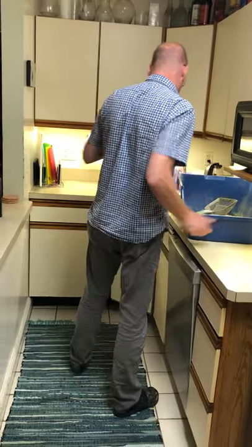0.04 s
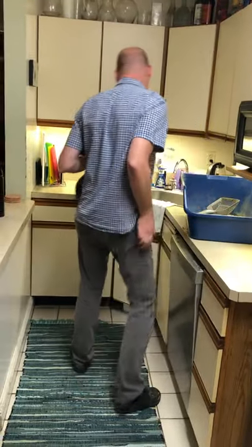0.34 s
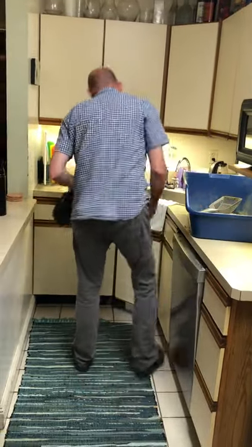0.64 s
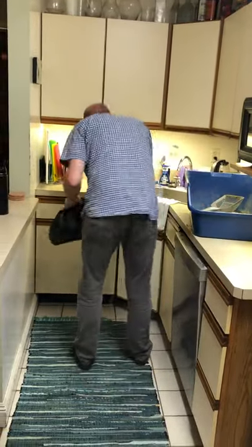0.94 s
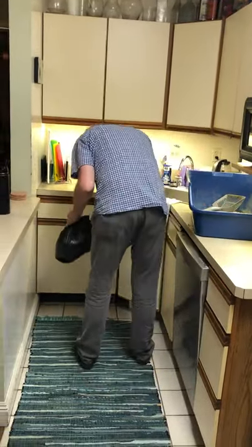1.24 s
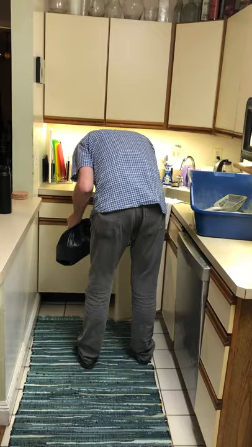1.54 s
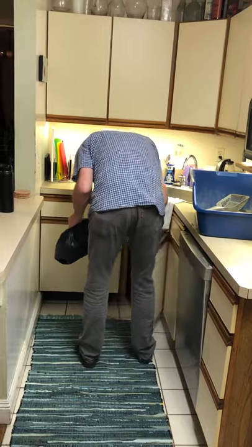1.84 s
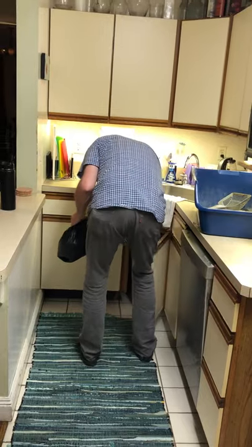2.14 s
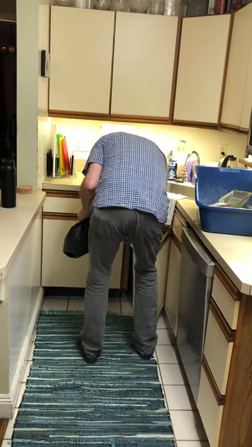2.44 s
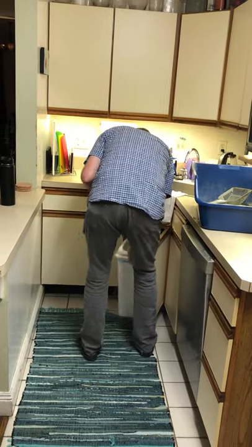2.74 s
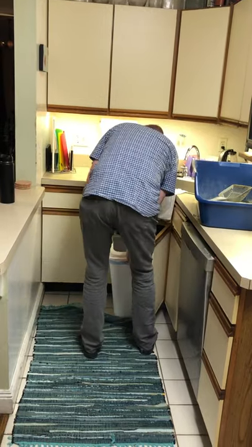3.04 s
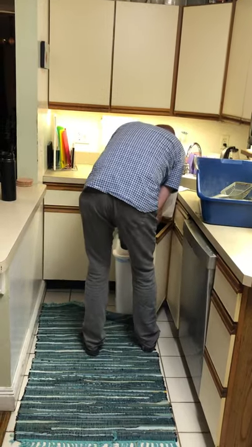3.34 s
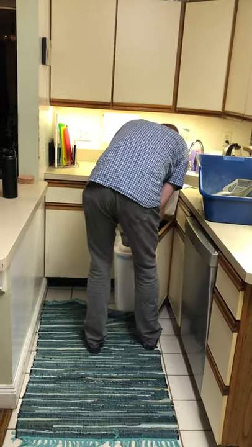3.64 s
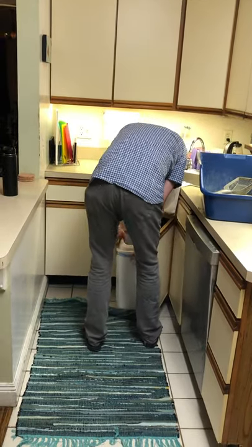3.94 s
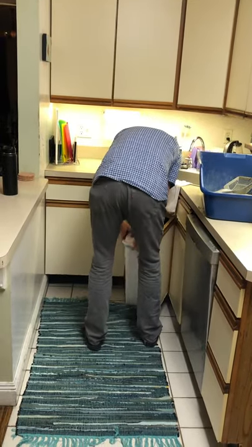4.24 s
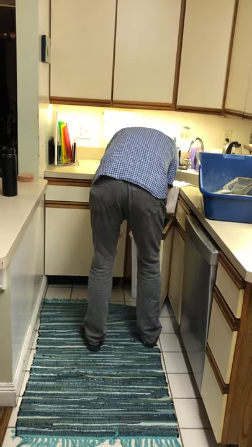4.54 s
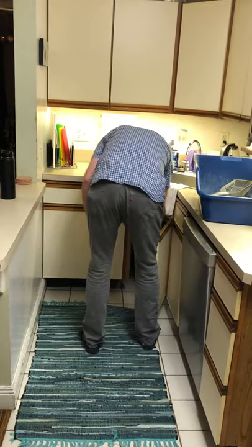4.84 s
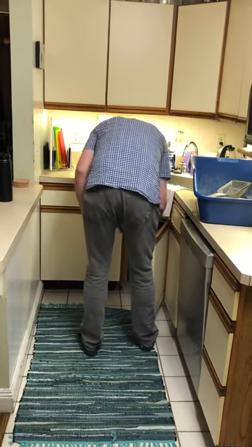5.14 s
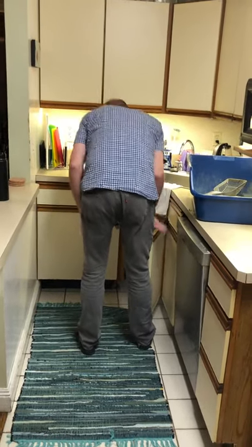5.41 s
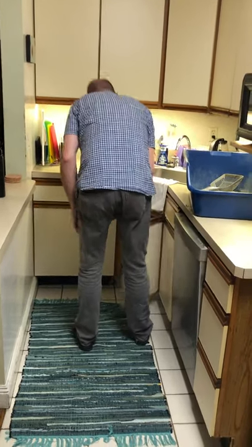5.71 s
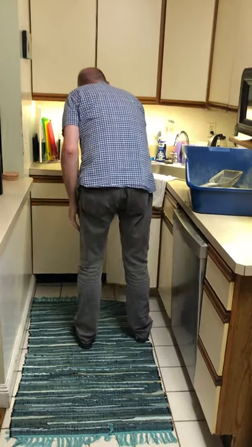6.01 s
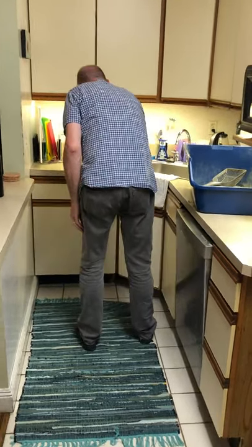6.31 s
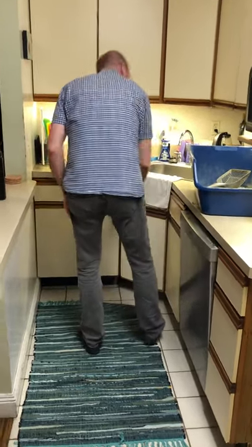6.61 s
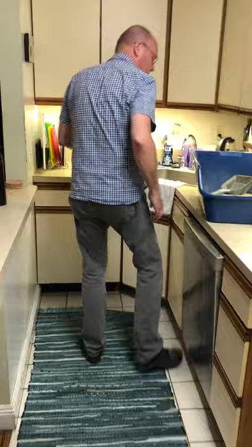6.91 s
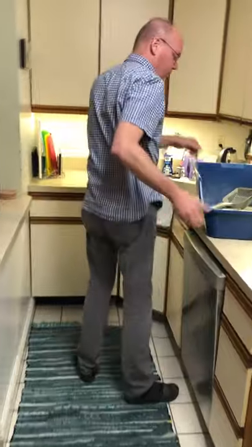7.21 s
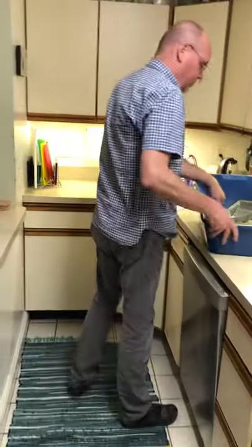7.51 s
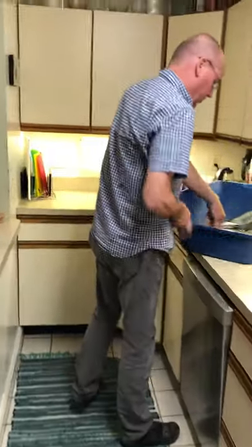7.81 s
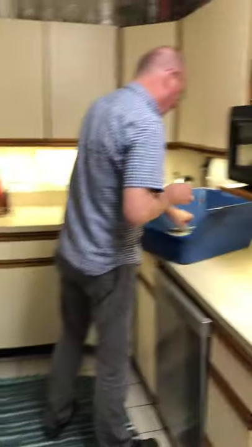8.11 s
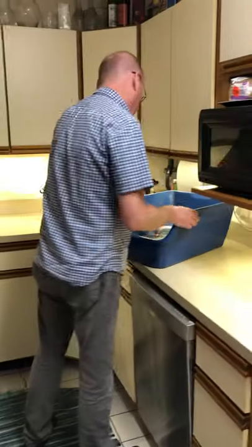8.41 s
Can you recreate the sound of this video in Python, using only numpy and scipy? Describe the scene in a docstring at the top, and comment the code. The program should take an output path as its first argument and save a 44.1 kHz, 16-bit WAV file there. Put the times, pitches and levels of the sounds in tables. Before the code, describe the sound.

A faint appliance hum runs throughout in a small kitchen with a short, hard echo. Clothes swish, shoes shuffle and small parts click during the first second. At 1.2 seconds a cupboard door bangs open. From about 2.2 to 3.1 seconds a plastic bin is dragged out over the floor, scraping and droning, with hollow knocks, the strongest at 2.6. A bag rustles, and litter hisses into the bin in two short gushes at about 3.3 and 3.6 seconds. From 4.1 to 5.1 seconds the bin slides back with more bumps and a rattle. Soft shuffles follow. At 6.3 seconds the door slams shut with a sharp crack, a ringing panel and a low thud, the loudest sound. From about 7.5 to 8.2 seconds a plastic litter box slides along the counter with a gritty hiss and one small squeak.

```python
"""A cupboard door bangs open and later slams shut in a small hard kitchen: a crack, a ringing panel, a boom.
In between, a plastic bin is dragged out and slid back, its thin walls droning and knocking hollowly;
a bag rustles and litter hisses into the bin, both as streams of tiny noise grains.
Last, a plastic litter box slides along the counter with a gritty hiss and one squeak.
Shoes shuffle, small parts click, and an appliance hums underneath throughout."""
import sys
import numpy as np
from scipy import signal
from scipy.fft import rfft, irfft, next_fast_len
from scipy.io import wavfile
from scipy.ndimage import map_coordinates

SR = 44100
rng = np.random.default_rng(int(sys.argv[2]) if len(sys.argv) > 2 else 0)


def file_out(sig):
    """Save sig as 16-bit WAV at sys.argv[1]."""
    # one column per channel
    cols = np.atleast_2d(sig).T
    # limit, then scale
    lim = np.clip(cols, -1, 1)
    pcm = np.round(lim * 32767).astype(np.int16)
    wavfile.write(sys.argv[1], SR, pcm)


N = 373086
TIME = np.arange(N) / SR  # the whole scene [s]
HIT_TIME = np.arange(SR) / SR  # the life of one hit [s]


def amp(db):
    """Decibels to gain."""
    return 10 ** (np.asarray(db) / 20)


def unit(x):
    """Scale to rms 1."""
    return x / np.sqrt(np.mean(x ** 2) + 1e-20)


def along(points, hz):
    """Read a curve of (frequency, value) points on a log frequency axis."""
    freqs, values = np.transpose(points)
    return np.interp(np.log(hz + 1), np.log(freqs + 1), values)


def wobble(rate):
    """A smooth random modulator, rate knots a second."""
    knots = rng.standard_normal(int(N * rate / SR) + 4)
    return map_coordinates(knots, [TIME * rate])


def colour(x, spectrum):
    """EQ x with a spectrum and scale it to rms 1."""
    size = next_fast_len(len(x) + 8192)
    gain = amp(along(spectrum, np.fft.rfftfreq(size, 1 / SR)))
    return unit(irfft(rfft(x, size) * gain, size)[:len(x)])


def fade(t60):
    """Exponential decay, 60 dB down after t60 seconds."""
    return np.exp(-np.log(1000) * HIT_TIME / t60)


def swell(seconds):
    """A soft attack."""
    return 1 - np.exp(-HIT_TIME / seconds)


def ring(hz, t60):
    """One struck mode."""
    return np.sin(2 * np.pi * hz * HIT_TIME) * fade(t60)


def add_hit(track, at, hit, db):
    """Mix a hit in at a time in seconds, with db as the rms level of its first 40 ms."""
    start = round(at * SR)
    track[start:start + len(hit)] += amp(db) * hit[:N - start] / np.std(hit[:SR // 25])


def grains(spectrum, rate, wash_db):
    """Friction: tiny slips of uneven size, rate a second, over a steady noise wash."""
    slips = unit((rng.random(N) < rate / SR) * rng.standard_normal(N))
    return colour(slips + amp(wash_db) * rng.standard_normal(N), spectrum)


# reverb time of the kitchen: (frequency [Hz], t60 [s])
ROOM_DECAY = [(60, 0.89), (250, 0.49), (1000, 0.56), (3500, 0.5), (7500, 0.5), (12000, 0.14)]


def room_tail(noise):
    """Each frequency dies away as it does between tiles and cupboards."""
    hz, t, bins = signal.stft(noise, SR, nperseg=256)
    decay = amp(-60 * t / along(ROOM_DECAY, hz)[:, None])
    tail = signal.istft(bins * decay, SR, nperseg=256)[1][:SR]
    return tail * swell(0.0022)


def in_kitchen(x, wet_db):
    """Direct sound plus a fresh room tail."""
    response = unit(room_tail(rng.standard_normal(SR))) / np.sqrt(SR)
    return x + amp(wet_db) * signal.fftconvolve(x, response)[:len(x)]


def burst(spectrum, t60, wet_db):
    """Many close modes struck at once, as decaying noise with its room tail."""
    direct, diffuse = (colour(rng.standard_normal(SR), spectrum) for _ in range(2))
    return unit(direct * fade(t60)) + amp(wet_db) * unit(room_tail(diffuse))


# partials of the hum: (frequency [Hz], rms level [dB])
HUM_PARTIALS = [(60, -56), (120, -69.5), (210, -69), (275, -67)]
# room tone EQ: (frequency [Hz], gain [dB])
ROOM_TONE_EQ = [(20, -41), (36, -20), (48, -7.5), (65, -8), (85, -13), (120, -10.5), (190, -8), (280, -8),
                (440, -16), (900, -23), (2150, -30.5), (3600, -31.5), (15000, -43)]


def appliance():
    """The bed: mains hum, drifting slightly in phase, over the still air of the room."""
    hum = sum(np.sqrt(2) * amp(db) * np.sin(2 * np.pi * hz * TIME + 0.12 * wobble(2.5))
              for hz, db in HUM_PARTIALS)
    room_tone = amp(-60) * colour(rng.standard_normal(N), ROOM_TONE_EQ)
    return hum + room_tone


# fader curve of one push of the box, following its speed: (time [s], level [dB])
BOX_PUSH = [(7.3, -82), (7.322, -72.5), (7.556, -64), (7.58, -55.5), (7.62, -60.5), (7.642, -46.5),
            (7.84, -36.5), (8.038, -38.5), (8.3, -76)]
# EQs of the tub's low rub and the gritty hiss: (frequency [Hz], gain [dB])
RUB_EQ = [(24, -36), (42, -15), (65, 0.5), (140, -11), (220, -1), (360, -7), (850, -8.5), (1800, -7.5),
          (3500, -27)]
HISS_EQ = [(700, -17), (1200, -12.5), (2500, -2.5), (4200, -1.5), (6000, -3), (8000, -5.5), (13500, -7),
           (15800, -10)]


def litter_box():
    """The gritty underside hisses over the counter and rubs the tub into a low murmur."""
    times, levels = np.transpose(BOX_PUSH)
    push_db = np.interp(TIME, times, levels, left=-120, right=-120)
    midway = (times[0] + times[-1]) / 2
    lean_db = 8 * (TIME - midway)  # the hand leans ever harder on the box
    rub_db = -22.5 + 0.63 * push_db + lean_db  # grows more slowly with speed than the hiss
    rub = amp(rub_db + 1.35 * wobble(30)) * grains(RUB_EQ, rate=620, wash_db=0.5)
    hiss = amp(push_db + 0.5) * grains(HISS_EQ, rate=3900, wash_db=7.5)
    out = rub + hiss
    # the plastic sticks and slips, squeaking higher as the box gains speed
    flutter = amp(3.5 * wobble(110)[:SR])
    squeak = ring(790 + 350 * HIT_TIME, t60=0.28) * swell(0.0074) * flutter
    add_hit(out, 7.76, squeak, db=-48.5)
    return out


def stroke(at, length, attack, t60):
    """Power envelope of one move: it eases in, holds, then dies away in the room."""
    t = TIME - at
    rise = np.sin(np.pi / 2 * np.clip(t / attack, 0, 1)) ** 1.5
    release = np.exp(-np.log(1000) * np.maximum(t - length, 0) / t60)
    return (rise * release) ** 2


# swishes of clothes and bag: (time [s], length [s], level [dB])
SWISH_CUES = [(-.04, 0.17, -67.5), (0.141, 0.37, -58.5), (.6, 0.15, -60.5), (0.84, 0.1, -63),
              (1.598, .07, -65), (2.169, .06, -61.5), (2.251, 0.055, -52), (2.37, 0.051, -61),
              (2.51, 0.22, -56.5), (2.77, 0.34, -57.5), (3.18, 0.13, -64), (3.963, 0.29, -55.5),
              (4.294, .16, -57.5), (4.443, 0.11, -49.5), (4.676, 0.18, -56), (4.932, .09, -60.5),
              (6.856, 0.052, -69), (8.322, 0.12, -65)]
# drags of the bin over the floor: (time [s], length [s], drone level [dB], scrape level [dB])
DRAG_CUES = [(2.267, 0.062, -44.5, -52.5), (2.4, 0.069, -63, -54.5), (2.511, .1, -39, -47),
             (2.591, 0.097, -31, -46), (2.74, 0.062, -46, -49.5), (2.846, 0.26, -52.5, -62.5),
             (4.117, 0.15, -38, -39.5), (4.327, 0.53, -47.5, -46), (4.78, 0.33, -44, -49.5)]
# gushes of litter into the bin: (time [s], length [s], hiss level [dB], landing clumps level [dB])
GUSH_CUES = [(3.331, 0.27, -41, -43), (3.634, 0.16, -40.5, -37)]
# shuffles of shoes on the rug: (time [s], length [s], level [dB])
SHUFFLE_CUES = [(0.39, 0.073, -65), (0.935, .06, -55.5), (1.487, 0.14, -55), (1.727, .08, -68),
                (2.01, 0.061, -57), (5.516, 0.042, -52), (5.66, 0.063, -64), (5.893, 0.043, -53),
                (6.02, 0.17, -63)]


def movements():
    """Each move feeds (drone, scrape, rustle) in its own proportions; returns three fader curves in dB."""
    moves = [(stroke(at, length, attack=0.037, t60=0.74), (-np.inf, db - 2.5, db))
             for at, length, db in SWISH_CUES]
    moves += [(stroke(at, length, attack=0.057, t60=0.54), (drone_db, scrape_db, scrape_db - 13))
              for at, length, drone_db, scrape_db in DRAG_CUES]
    moves += [(stroke(at, length, attack=0.17, t60=0.96), (clumps_db + 1.5, clumps_db, hiss_db))
              for at, length, hiss_db, clumps_db in GUSH_CUES]
    moves += [(stroke(at, length, attack=0.027, t60=0.61), (db, db - 11.5, db - 23))
              for at, length, db in SHUFFLE_CUES]
    envelopes, sends_db = zip(*moves)
    layer_power = amp(sends_db).T ** 2 @ np.array(envelopes)
    return 10 * np.log10(layer_power + 1e-12)


def crinkle(spectrum, rate):
    """Sparse snaps of thin plastic film, rate a second, each with a short flutter after it."""
    snaps = (rng.random(N) < rate / SR) * rng.uniform(0.4, 1, N)
    envelope = signal.fftconvolve(snaps, fade(t60=0.02))[:N]
    return colour(envelope * rng.standard_normal(N), spectrum)


# EQs of the hollow drone, the midrange scrape and the bright rustle: (frequency [Hz], gain [dB])
DRONE_EQ = [(25, -31), (70, -12.5), (120, -11), (200, 2), (300, -5), (420, -14), (800, -23), (2000, -66)]
SCRAPE_EQ = [(200, -12.5), (400, -3), (850, 0.5), (1500, -2.5), (2500, -7), (4500, -15.5), (12000, -42.5)]
RUSTLE_EQ = [(500, -25.5), (1500, -10.5), (3000, -0.5), (5000, 0.5), (8000, -1.5), (12000, -4), (15500, -7)]


def handling():
    """The dragged bin drones and scrapes; cloth, bag and litter rustle above it."""
    drone_db, scrape_db, rustle_db = movements()
    judder_db = 1.1 * wobble(35)
    drone = amp(drone_db - 0.73 + judder_db) * grains(DRONE_EQ, rate=400, wash_db=1.5)
    scrape = amp(scrape_db - 0.83 + 0.5 * judder_db) * grains(SCRAPE_EQ, rate=540, wash_db=4)
    rustle = amp(rustle_db - 0.25 + 1.4 * wobble(28)) * grains(RUSTLE_EQ, rate=2300, wash_db=10)
    # single snaps stand out in slow handling and merge into the rustle when it is brisk
    snaps = amp(np.minimum(rustle_db - 9, -61)) * crinkle(RUSTLE_EQ, rate=18)
    return drone + scrape + rustle + snaps


# clicks and rattles of plastic, catches and shoes, levels before trim:
# (time [s], body level [dB], pitch [Hz], snap level [dB], t60 [s])
TICK_CUES = [(0.293, -43, 960, -60, 0.091), (0.478, -38, 2310, -44, 0.059), (0.82, -68, 4000, -50.5, .01),
             (0.945, -39, 1610, -68, 0.027), (0.963, -54, 1500, -50, 0.022), (1.187, -72, 3000, -60, .015),
             (1.994, -41, 1490, -44.5, 0.034), (2.01, -37.5, 1010, -47.5, 0.055),
             (2.519, -33.5, 1600, -62, 0.043), (2.61, -27, 1290, -42, 0.099),
             (3.074, -33.5, 1640, -63, 0.014), (3.397, -37, 990, -60, 0.024), (3.812, -28, 790, -55, 0.11),
             (4.171, -33.5, 1430, -31.5, 0.27), (4.955, -39, 1510, -60, .02),
             (5.533, -56, 1310, -66, 0.044), (5.68, -57, 1500, -65.5, .03), (5.915, -57, 1700, -70, .03),
             (7.083, -39, 890, -78, 0.088), (7.601, -53, 1130, -63, .04)]


def ticks():
    """Hard little contacts: one broad resonance and a bright snap, drawn out when the part rattles."""
    out = np.zeros(N)
    for at, body_db, hz, snap_db, t60 in TICK_CUES:
        body_eq = [(hz / 4, -20), (hz / 2, -5), (hz, 0), (hz * 2, -6), (hz * 5, -28), (hz * 12, -42)]
        add_hit(out, at, burst(body_eq, t60, wet_db=0.5), body_db - 15.5)
        add_hit(out, at, burst(RUSTLE_EQ, t60, wet_db=1.5), snap_db - 11)
    return out


# hollow knocks of bin, box and cupboard, levels before trim:
# (time [s], level [dB], pitch [Hz], clatter level [dB])
BUMP_CUES = [(0.913, -37.5, 135.3, -48), (0.934, -36, 133, -61), (2.197, -37.5, 176, -51.5),
             (2.32, -42, 108, -63), (2.533, -35, 207, -44), (2.584, -30, 188, -44.5),
             (2.626, -15, 180.6, -30), (2.681, -24.5, 189, -48), (2.965, -27.5, 188, -58),
             (3.076, -27.5, 193.7, -36), (3.116, -28, 195.7, -64), (3.398, -26, 177.5, -35.5),
             (3.446, -29, 245, -38.5), (3.63, -27.5, 194, -35), (3.766, -35, 211, -38),
             (3.806, -26.5, 220, -25), (4.16, -19.5, 162.8, -32.5), (4.188, -19.5, 171.7, -29),
             (4.244, -27.5, 159, -37), (4.838, -27, 291, -33.5), (4.952, -26.5, 284, -32.5),
             (5.014, -36, 293, -35), (5.041, -42, 98, -50), (5.13, -39, 116, -56), (5.56, -39, 111.4, -61),
             (7.604, -47, 107, -44.5), (7.965, -38.5, 283, -39)]
# modes of the bin's walls: (frequency [multiple of the pitch], relative level [dB])
WALL_MODES = [(.78, -4), (1, 4), (1.16, -4.5), (1.36, -18), (1.72, -11.5), (2.3, -23)]
# EQs of the clattering contents and the floor's thump: (frequency [Hz], gain [dB])
CLATTER_EQ = [(150, -8), (350, 1.5), (650, 2), (950, 2), (1500, -6), (2200, -20), (3500, -27.5),
              (8000, -32)]
FLOOR_EQ = [(20, -23), (40, -9), (85, 6), (120, 5.5), (250, -72)]


def bumps():
    """Soft blows set the bin's thin walls booming and its contents clattering; the floor follows."""
    out = np.zeros(N)
    for at, db, hz, clatter_db in BUMP_CUES:
        walls = np.zeros(SR)
        for ratio, mode_db in WALL_MODES:
            gain = amp(mode_db + rng.normal(0, 1.6))
            detune = 1 + rng.normal(0, 0.01)
            walls += gain * ring(hz * ratio * detune, t60=0.15)
        add_hit(out, at, in_kitchen(walls * swell(0.0048), wet_db=-15), db - 11.5)
        add_hit(out, at, burst(CLATTER_EQ, t60=0.055, wet_db=4), clatter_db - 8.5)
        floor_db = -30 + 0.65 * db - 9.5 * np.log2(hz / 180)  # more thump under heavy, low bumps
        add_hit(out, at, burst(FLOOR_EQ, t60=0.25, wet_db=-9.5) * swell(0.014), floor_db)
    return out


# the door banging open, then shut, levels before trim: (time [s], crack level [dB], thud level [dB],
# boom level [dB], panel level [dB], hardness [factor on the crack's frequencies])
SLAM_CUES = [(1.236, -17, -32.5, -50, -34, 0.82), (6.315, -7, -27.5, -31, -26, 1.04)]
# modes of the door panel: (frequency [Hz], relative level [dB], t60 [s])
PANEL_MODES = [(85.7, 7, 0.51), (129, -2, 1), (329, 3.5, 0.56), (534, 2.5, .45), (617, -5, 0.49),
               (660, 3.5, 0.36), (928, 6.5, 0.37), (1425, -2.5, 0.55), (1810, -3.5, 0.45), (2110, -1, .35),
               (2250, -8, 0.37), (2520, -12, 0.4), (3010, -4, 0.37), (3390, -5, .4), (3693, -9, 0.33),
               (5000, -11, .3)]
# EQs of the panel's knock, the sharp crack and the low thud: (frequency [Hz], gain [dB])
KNOCK_EQ = [(150, -23.5), (400, -3), (600, 4), (950, 3), (1200, 0.5), (1600, 0), (3200, -9), (5000, -18),
            (8000, -20), (15000, -34.5)]
CRACK_EQ = [(300, -33), (1000, -27.5), (2000, 8), (3600, 5.5), (5400, -3.5), (7000, -11), (10000, -19.5),
            (16000, -33.5)]
THUD_EQ = [(20, -24), (42, -2), (85, -7.5), (125, -8.5), (210, -5), (320, -10), (450, -11.5), (900, -45.5)]


def cupboard_door():
    """The edge touches, the face cracks home just after; the panel rings and the cupboard booms."""
    out = np.zeros(N)
    for at, crack_db, thud_db, boom_db, panel_db, hardness in SLAM_CUES:
        panel = sum(amp(db) * ring(hz, t60) * rng.choice([-1, 1]) for hz, db, t60 in PANEL_MODES)
        knock = burst(KNOCK_EQ, t60=0.07, wet_db=5)
        crack_eq = [(hz * hardness, db) for hz, db in CRACK_EQ]  # a harder blow is brighter
        crack = burst(crack_eq, t60=0.031, wet_db=-4)
        thud = burst(THUD_EQ, t60=0.49, wet_db=-3.5) * swell(0.0049)
        boom = ring(hz=215, t60=0.17) * swell(0.016)
        add_hit(out, at + 0.001, knock, panel_db - 3.5)
        add_hit(out, at + 0.001985, panel, panel_db - 5.5)
        add_hit(out, at + 0.002, crack, crack_db - 21)
        add_hit(out, at + 0.003, thud, thud_db - 6)
        add_hit(out, at + 0.0049, boom, boom_db - 4.5)
    return out


def scene():
    """All layers mixed dead centre."""
    mono = cupboard_door() + bumps() + ticks() + handling() + litter_box() + appliance()
    return np.array([mono, mono])


def record(dry):
    """A brick-wall low-pass on the whole mix."""
    cutoff_hz = 15900
    size = next_fast_len(N + SR // 2)
    passband = np.fft.rfftfreq(size, 1 / SR) < cutoff_hz
    return irfft(rfft(dry, size) * passband, size)[:, :N]


dry = scene()
out = record(dry)
file_out(out)
```